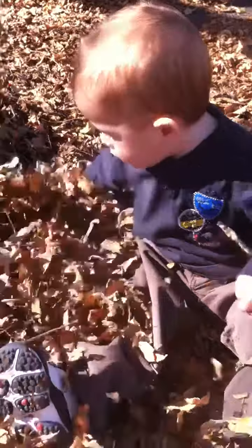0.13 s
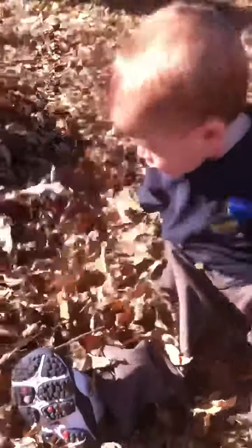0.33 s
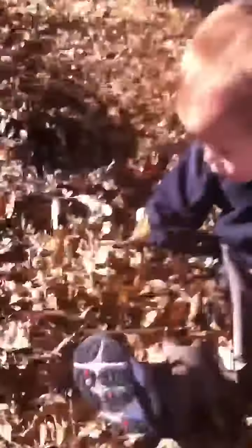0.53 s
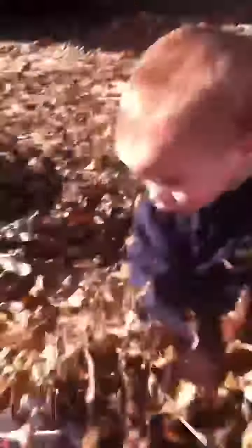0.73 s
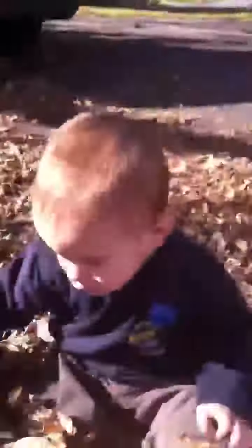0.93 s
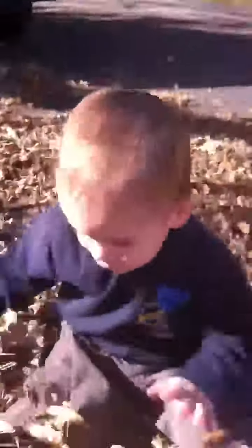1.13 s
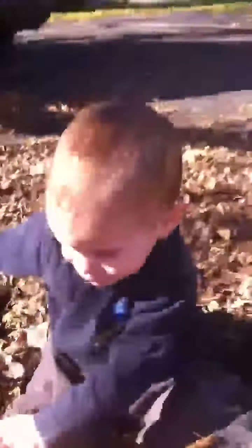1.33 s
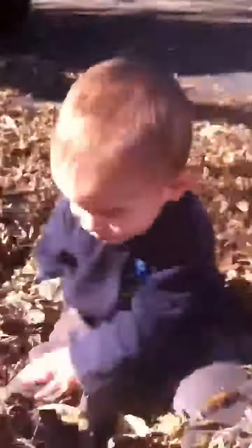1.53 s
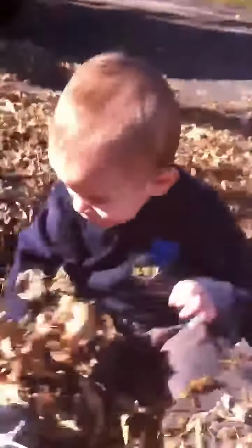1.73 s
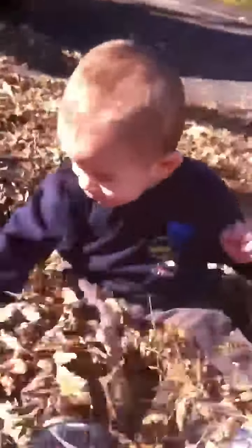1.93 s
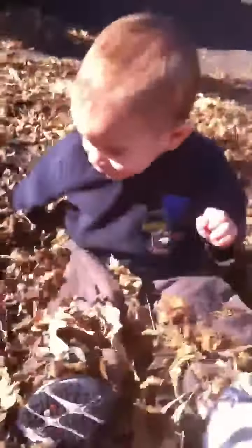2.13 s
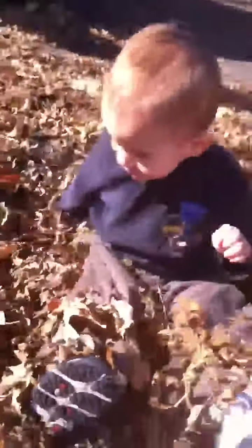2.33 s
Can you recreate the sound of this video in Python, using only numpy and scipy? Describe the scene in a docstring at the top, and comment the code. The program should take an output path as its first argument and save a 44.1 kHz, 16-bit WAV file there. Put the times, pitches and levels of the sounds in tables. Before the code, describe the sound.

Dry leaves swished and stirred by hands outdoors, close up, with low wind thumps on the microphone

```python
"""Hands sweep through a heap of dry leaves outdoors, close to a small mono microphone.
Thousands of brittle contacts, ringing a few cycles each, merge with sliding noise into a bright swish.
Short sprays of clicks add sharper crackles. Wind buffets the microphone: lumpy low noise makes the
rumble, and bell-shaped low wobbles make the puffs. A wandering sine wave hums faintly, far off."""
import sys
import numpy as np
from scipy import signal
from scipy.fft import rfft, irfft
from scipy.io import wavfile

SR = 44100
rng = np.random.default_rng(int(sys.argv[2]) if len(sys.argv) > 2 else 0)


def persist_wave(psi):
    """Save psi, clipped to +-1, as 16-bit WAV."""
    counts = np.round(np.clip(psi, -1, 1) * 32767).astype(np.int16)
    wavfile.write(sys.argv[1], SR, np.atleast_2d(counts).T)


N = 110250   # length in samples: 2.5 seconds


def amp(db):
    """Turn decibels into a gain."""
    return 10 ** (np.asarray(db) / 20)


def unit(x):
    """Scale a sound to an average (rms) level of 1."""
    return x / np.sqrt(np.mean(x ** 2) + 1e-20)


def in_time(rows):
    """Join the rows of a timed table with straight lines: one curve per column, one value per sample."""
    seconds, *columns = np.transpose(rows)
    return [np.interp(np.arange(N) / SR, seconds, column) for column in columns]


def at_hz(points, hz):
    """Read a table of levels at any frequency, with octaves evenly spaced."""
    table_hz, table_db = np.array(points).T
    return np.interp(np.log(hz), np.log(table_hz), table_db)


def drift(rate_hz):
    """Slow random wandering with spread 1: noise smoothed twice, so faster changes than the rate fade."""
    step = 20   # samples between the computed points
    r = np.exp(-2 * np.pi * rate_hz * step / SR)
    noise = rng.standard_normal(N // step + 2002)
    slow = signal.lfilter([1], [1, -2 * r, r * r], noise)[2000:]   # drop the settling part
    return np.interp(np.arange(N) / step, np.arange(len(slow)), unit(slow))


def band(x, low_hz, high_hz):
    """Keep only the frequencies between two limits."""
    edges_hz = [low_hz, min(high_hz, .45 * SR)]
    return signal.sosfilt(signal.butter(2, edges_hz, "band", fs=SR, output="sos"), x)


def resonance(x, hz, width_hz):
    """Let a sound ring at one pitch, with gain 1 at the peak; a narrow width rings longer."""
    r = np.exp(-np.pi * width_hz / SR)
    feed = np.array([1, 0, -1]) * (1 - r * r) / 2
    ring = [1, -2 * r * np.cos(2 * np.pi * hz / SR), r * r]
    return signal.lfilter(feed, ring, x + 1e-18)   # the tiny offset avoids vanishingly small numbers


# The far drone, before its random wander and waver.
# Each row: time in seconds, pitch in Hz, average (rms) level in dB.
DRONE = [(0.1, 200.4, -49.5), (1.0, 193.2, -51.5), (1.6, 200.5, -51.5), (2.2, 197.7, -52.5),
         (2.5, 193.5, -47.5)]
HUM_WANDER_HZ, HUM_WAVER_DB = 3, 2.5


def hum():
    """A far drone: one sine wave whose pitch wanders a little and whose level wavers."""
    hz, level_db = in_time(DRONE)
    hz = hz + HUM_WANDER_HZ * drift(7.4)
    angle = 2 * np.pi * np.cumsum(hz) / SR
    level_db = level_db + HUM_WAVER_DB * drift(10)
    return np.sqrt(2) * amp(level_db) * np.sin(angle)   # root 2 turns the rms level into a peak


# Strength of the wind rumble, before its random lumps.
# Each row: time in seconds, level in dB of the part between 60 and 150 Hz.
GUST_LEVEL = [(0.09, -53), (0.12, -42), (0.16, -48), (0.28, -33), (0.36, -60), (0.48, -33.5), (0.54, -58.5),
              (0.66, -33.5), (0.7, -45.5), (0.77, -45), (0.82, -61), (0.88, -42.5), (0.98, -61),
              (1.24, -47.5), (1.3, -53), (1.395, -42), (1.42, -52), (1.49, -50.5), (1.67, -54.5),
              (1.88, -51.5), (1.95, -57.5), (2.25, -56.5), (2.5, -56)]
# Colour of the wind rumble; only the shape counts, and nothing sounds from the last frequency up.
# Each row: frequency in Hz, level in dB per Hz.
WIND_COLOUR = [(20, 11), (60, -13), (100, -3.5), (160, -1), (250, -6), (400, -15.5), (700, -39.5)]
WIND_LUMPY_DB = 1.5


def wind_rumble():
    """Wind rubs the microphone: noise coloured towards the bass, with a lumpy level."""
    level_db, = in_time(GUST_LEVEL)
    hz = np.fft.rfftfreq(N, 1 / SR) + 1   # 1 Hz up, so the logarithm never meets zero
    colour = amp(at_hz(WIND_COLOUR, hz)) * (hz < WIND_COLOUR[-1][0])
    rumble = unit(irfft(rfft(rng.standard_normal(N)) * colour, N))
    low_level = np.mean(band(rumble, 60, 150) ** 2) ** .5
    return rumble / low_level * amp(level_db + WIND_LUMPY_DB * drift(38))


# Wind puffs that push the microphone.
# Each row: centre in seconds, peak level in dB, pitch in Hz, length in ms between the half-height points.
WIND_PUFFS = [(0.12, -20, 202, 2.7), (0.137, -33, 174, 22), (0.155, -24, 280, 2.9), (0.204, -29, 207, 5.6),
              (0.246, -32, 168, 21), (0.257, -19, 227, 5), (0.278, -21.5, 197, 13),
              (0.288, -10.5, 240, 8.2), (0.326, -35, 180, 9.4), (0.406, -32, 195, 4.3),
              (0.436, -37, 169, 13), (0.46, -23, 243, 5.7), (0.48, -24, 170, 9.7), (0.5018, -17, 224, 5.6),
              (0.564, -30.5, 182, 5.9), (0.588, -31, 199, 4.8), (0.626, -19, 224, 8.8),
              (0.652, -16, 224, 3.8), (0.707, -22, 222, 8), (0.733, -28.5, 207, 8.5),
              (0.762, -22, 206, 5.5), (0.876, -28.5, 153, 11.6), (0.899, -48, 212, 2.6),
              (1.188, -31, 188, 7.7), (1.234, -24, 177, 5.5), (1.249, -31, 200, 9.7),
              (1.353, -29.5, 200, 38.6), (1.376, -28, 195, 7.1), (1.3934, -27.5, 139, 16),
              (1.3929, -20, 297, 2.2), (1.468, -33, 225, 6.6), (1.487, -28, 199.7, 8),
              (1.505, -30, 142, 9.9), (1.587, -36.5, 163, 11), (1.766, -35.5, 166, 7.7),
              (1.872, -38.5, 143, 18)]


def wind_puffs():
    """Puffs wobble the microphone's diaphragm: each is a low tone under a bell-shaped swell."""
    out, t = np.zeros(N), np.arange(N) / SR
    for centre_s, peak_db, pitch_hz, length_ms in WIND_PUFFS:
        half_lengths = 2000 * (t - centre_s) / length_ms
        bell = 2 ** -(half_lengths ** 2)
        out = out + amp(peak_db) * bell * np.cos(2 * np.pi * pitch_hz * (t - centre_s))
    return out


# Single leaves that crack.
# Each row: start in seconds, peak level in dB, centre pitch in Hz, fading time in ms (to about a third),
# reach to either side of the pitch in octaves.
LEAF_CRACKS = [(.339, -25, 6950, 3.9, 1.24), (0.5008, -23.5, 2800, 2.6, 2.1), (.563, -22, 5500, 5.8, 1.4),
               (0.574, -36, 4470, 5, 1.3), (0.873, -22.5, 7000, 6.4, 0.59), (0.888, -15.5, 6800, 2.4, 0.49),
               (1.129, -18.5, 8200, 3.6, 0.59), (1.233, -30, 8000, 2.5, 0.65),
               (1.365, -26.5, 3940, 3.1, 0.84), (1.371, -30, 7060, 4.5, 0.59), (1.409, -31, 7500, 2.5, .4),
               (1.454, -42, 6000, 2, 0.77), (1.463, -26, 2180, 3, 1.1), (1.535, -32, 3500, 4.1, 1),
               (1.556, -27, 4500, 5.3, 1.2), (1.576, -27, 2230, 4, 0.77), (1.802, -18, 6000, 4.4, 1.5),
               (1.83, -21.5, 5500, 21, 0.86), (1.937, -23, 6000, 3.2, 1), (2.004, -24.5, 6000, 12, 0.84),
               (2.092, -21.5, 6760, 7, 0.37), (2.226, -27, 4500, 5.2, 0.26)]


def cracks():
    """A leaf cracks: a short dying spray of clicks around its own pitch."""
    out, t = np.zeros(N + SR), np.arange(SR // 10) / SR
    noises = rng.standard_normal((len(LEAF_CRACKS), len(t)))
    for (start_s, peak_db, hz, fade_ms, octaves), noise in zip(LEAF_CRACKS, noises):
        clicks = noise * np.sqrt(np.abs(noise))   # makes the noise spikier
        dying = clicks * np.exp(-1000 * t / fade_ms)
        spray = band(dying, hz * 2 ** -octaves, hz * 2 ** octaves)
        first = int(start_s * SR)
        out[first:first + len(t)] += amp(peak_db) * spray / np.abs(spray).max()
    return out[:N]


CONTACTS_PER_S, CONTACT_SPREAD_DB = 9000, 1   # over all pitches together
CONTACT_CYCLES = 2.05                         # ringing falls to about 4 % in this many cycles


def contact_hits(pitch_count):
    """Tiny leaf contacts: single-sample knocks of random size and sign, each with a random pitch number."""
    sizes = amp(CONTACT_SPREAD_DB * np.minimum(rng.exponential(1, N), 6))
    hits = sizes * rng.choice([-1, 1], N)
    hits = hits * (rng.random(N) < CONTACTS_PER_S / SR)
    pitch = rng.random(N) ** .6 * pitch_count   # the power favours high pitches
    return hits, pitch


SNAPS_PER_S, SNAP_MS, SNAP_DB = 150, 2.0, 0   # fading time; strongest snap compared with steady sliding


def snapping():
    """Small leaf snaps: a gain that jumps up at random moments and quickly falls back to 1."""
    struck = rng.random(N) * (rng.random(N) < SNAPS_PER_S / SR)
    fade = np.exp(-1000 / (SNAP_MS * SR))
    return 1 + amp(SNAP_DB) * signal.lfilter([1], [1, -fade], struck)


# How hard the hands stir the leaves.
# Each row: time in seconds, rustle level (rms) in dB before random clumping, low-mid level in dB
# (only its departure from its own average counts).
STIRRING = [(0.085, -37.5, -7.5), (0.16, -31, -12.5), (0.26, -33, -13.5), (0.3, -36.5, -13.5),
            (0.335, -39, -11.5), (0.375, -43, -9.5), (0.43, -35.5, -15.5), (0.46, -36, -11.5),
            (0.495, -44, -11), (0.515, -44.5, -12), (0.555, -39, -12), (0.58, -33.5, -17), (0.6, -35, -15),
            (0.62, -31, -15.5), (0.68, -28.5, -14), (0.72, -26.5, -12.5), (0.75, -28, -16.5),
            (0.79, -38, -12.5), (0.85, -38.5, -10.5), (0.865, -35, -14), (0.89, -30, -9),
            (0.92, -35.5, -10.5), (0.97, -32.5, -14), (1.05, -36, -11), (1.15, -36, -11.5),
            (1.18, -42.5, -10), (1.3, -39.5, -10), (1.36, -38, -9), (1.45, -37.5, -10), (1.55, -40, -8.5),
            (1.59, -34, -12.5), (1.63, -31.5, -15), (1.76, -31.5, -15), (1.84, -28, -13), (1.88, -31, -15),
            (1.93, -32.5, -10), (2.0, -32, -15.5), (2.1, -33, -14), (2.19, -35.5, -13), (2.23, -33.5, -16),
            (2.27, -40.5, -12.5), (2.39, -45, -7), (2.5, -40, -12.5)]
# Level of the treble over time: dullest from about 1.36 to 1.55 s, bright again by the end.
# Each row: time in seconds, change of the top in dB.
TREBLE = [(0.085, 2), (.45, -1.5), (.8, 2.5), (1.2, 1), (1.36, -7.5), (1.55, -10), (1.62, -0.5), (2.5, 2)]
# Basic colour of the rustle; only the shape counts.
# Each row: frequency in Hz, level in dB per Hz.
LEAF_COLOUR = [(330, -3.5), (450, -6), (800, -3.5), (1500, -2), (3000, -2), (6000, -0.5), (9000, 0.5),
               (12000, -3), (15000, -4)]
LOW_HINGE_HZ, TOP_HINGE_HZ = 2750, 7800    # the low-mid change grows below one, the top's around the other
CLUMP_DB, CLUMPS_PER_S = 0.5, 20           # random swelling of the whole rustle
SWISH_SHARE, SWISH_PATCHY_DB = 0.69, 1.13  # power share of sliding noise; its unevenness


def leaves():
    """Contacts ring a few cycles at every pitch, over snapping, sliding noise; harder stirring is louder."""
    (level_db, low_db), (top_db,) = in_time(STIRRING), in_time(TREBLE)
    edges = 330 * 2 ** np.arange(0, 5.8, 1 / 3)   # bands a third of an octave wide, in Hz
    clump = drift(CLUMPS_PER_S)
    hits, pitch = contact_hits(len(edges))
    white = rng.standard_normal((2, N))
    out = np.zeros(N)
    for k, (low, high) in enumerate(zip(edges, edges[1:])):
        hz = np.sqrt(low * high)
        nearby_hits = hits * (np.abs(pitch - k - 1) < 1)
        contacts = unit(resonance(nearby_hits, hz, hz / CONTACT_CYCLES))
        if k % 4 == 0:   # four neighbouring bands snap together
            snap = snapping()
        slide = unit(band(white[k % 2] * snap, low, high))
        slide = slide * amp(SWISH_PATCHY_DB * drift(42))
        low_part = np.clip(np.log2(LOW_HINGE_HZ / hz), 0, 1)
        top_part = np.clip(np.log2(hz / TOP_HINGE_HZ) + .5, 0, 1)
        tilt_db = low_part * (low_db - low_db.mean()) + top_part * top_db
        gain = amp(at_hz(LEAF_COLOUR, hz) + tilt_db) * np.sqrt(high - low)   # wider bands hold more power
        out = out + gain * (np.sqrt(SWISH_SHARE) * slide + np.sqrt(1 - SWISH_SHARE) * contacts)
    return unit(out) * amp(level_db + CLUMP_DB * clump)


def scene():
    """Everything reaches one microphone, which feeds both channels."""
    mono = leaves() + cracks() + wind_rumble() + wind_puffs() + hum()
    return np.tile(mono, (2, 1))


START_S, FADE_IN_S = 0.08, 0.0071
MIC_LOW_CUT_HZ, CUTOFF_HZ = 100, 15750


def record(dry):
    """Sound fades in after a short silence; the small microphone drops deep bass and the top is cut."""
    thin = signal.sosfilt(signal.butter(3, MIC_LOW_CUT_HZ, "high", fs=SR, output="sos"), dry)
    fade_in = np.clip((np.arange(N) / SR - START_S) / FADE_IN_S, 0, 1)
    thin = thin * np.sin(np.pi / 2 * fade_in) ** 2
    # a very steep treble cut: 0.5 dB of ripple below it, 75 dB of loss above
    return signal.sosfilt(signal.ellip(14, .5, 75, CUTOFF_HZ, fs=SR, output="sos"), thin)


dry = scene()
out = record(dry)
persist_wave(out)
```